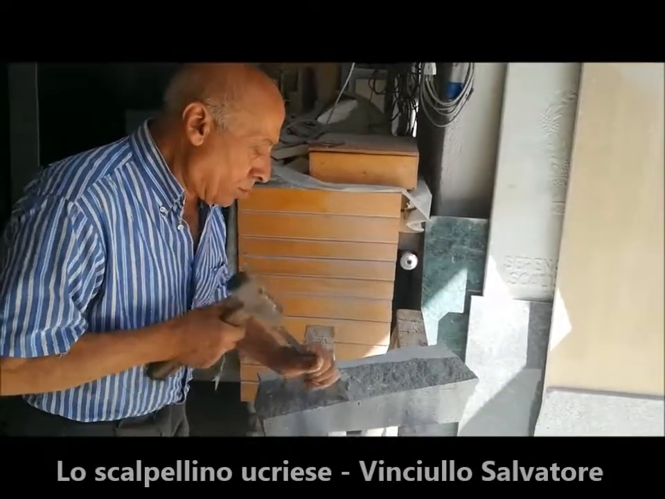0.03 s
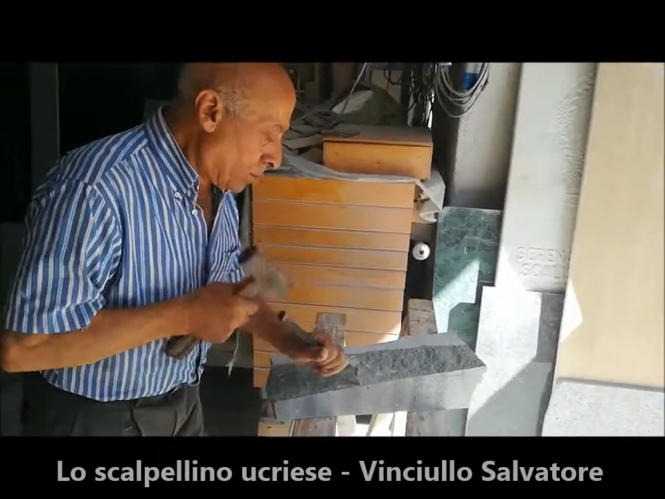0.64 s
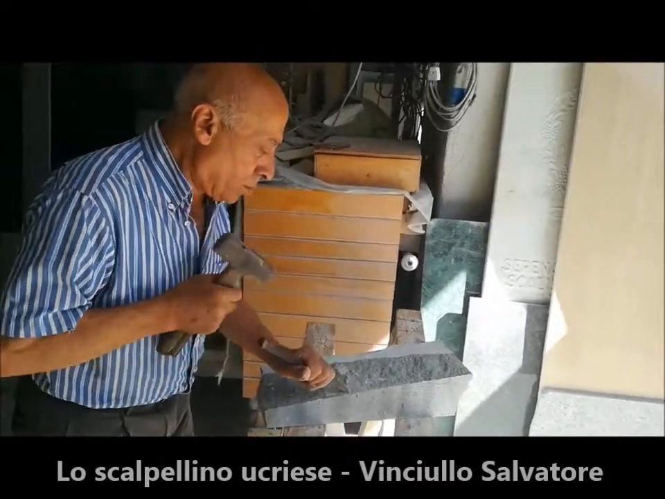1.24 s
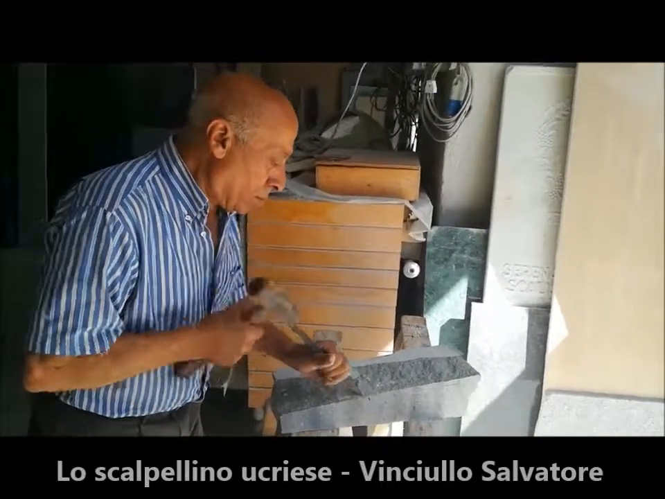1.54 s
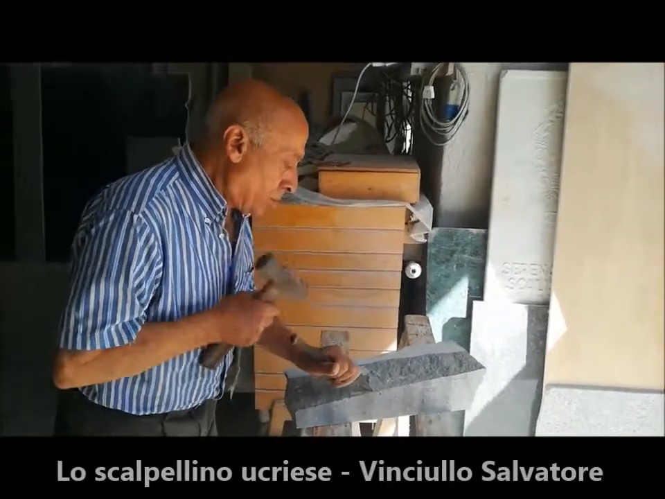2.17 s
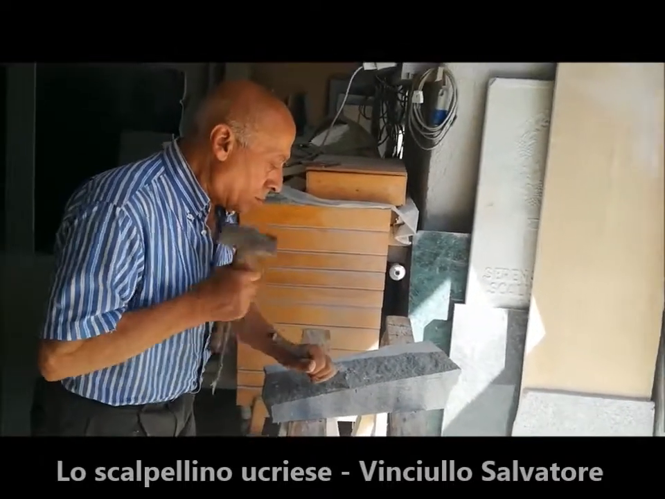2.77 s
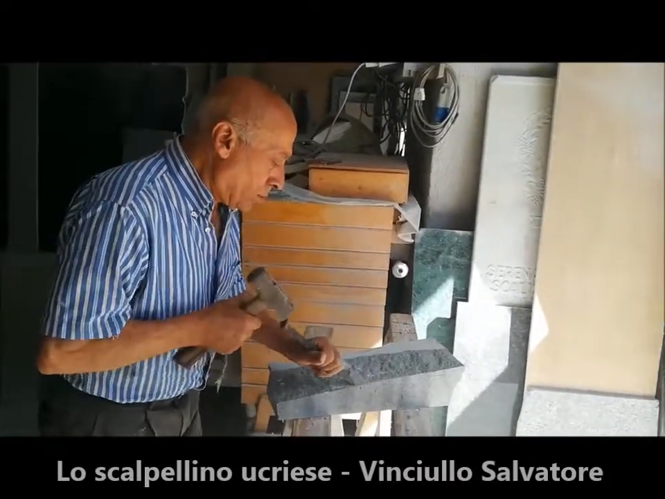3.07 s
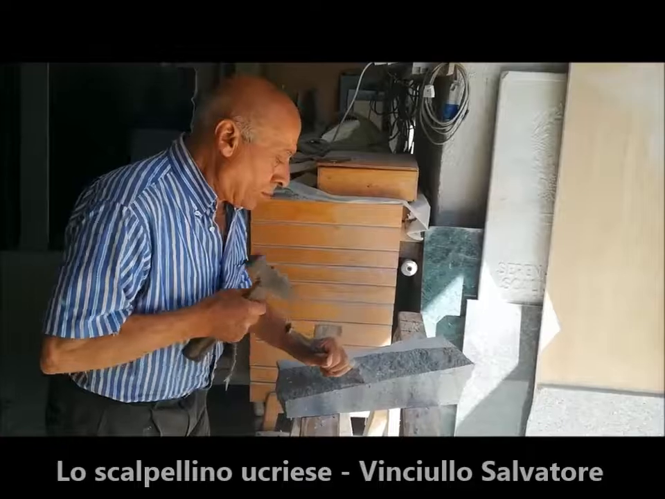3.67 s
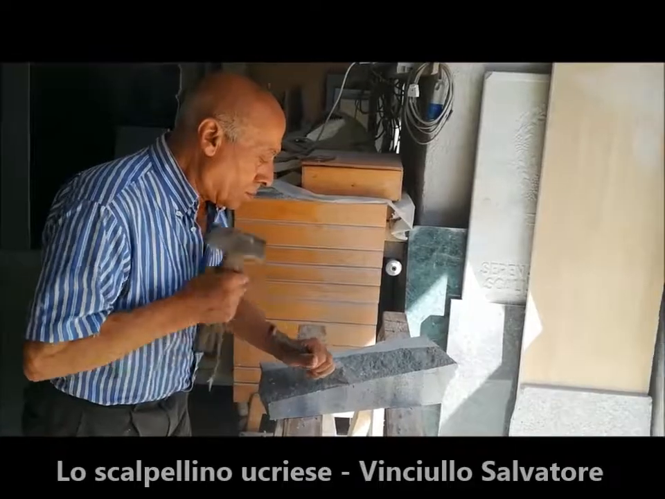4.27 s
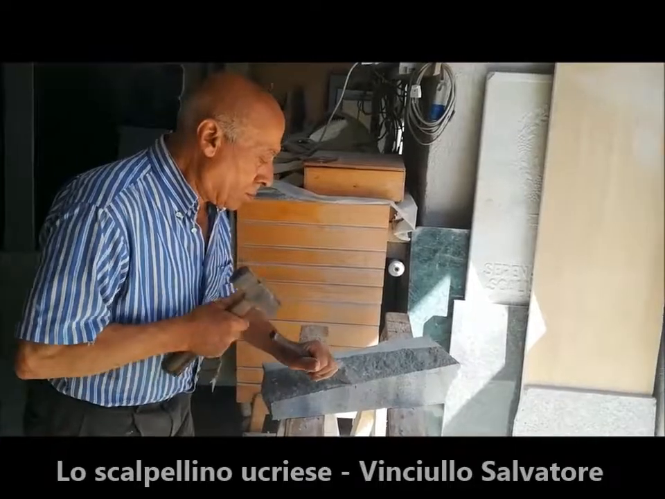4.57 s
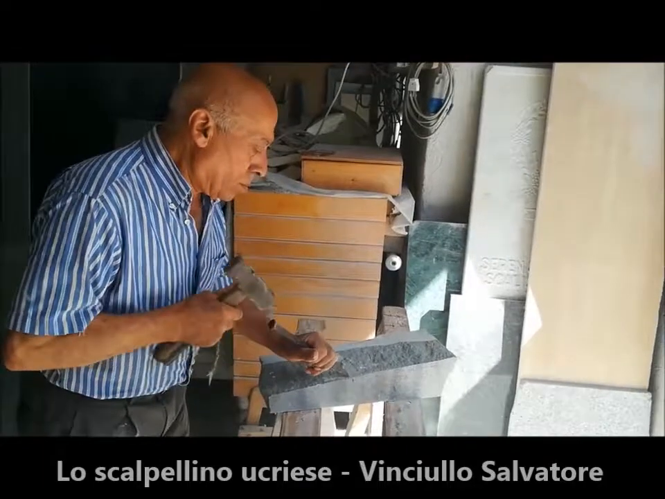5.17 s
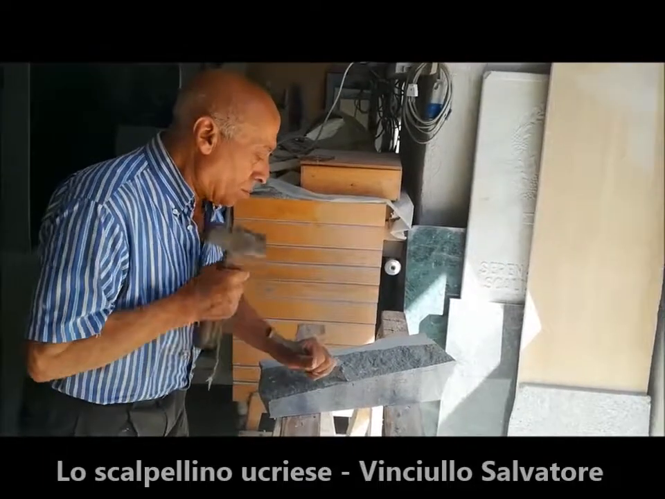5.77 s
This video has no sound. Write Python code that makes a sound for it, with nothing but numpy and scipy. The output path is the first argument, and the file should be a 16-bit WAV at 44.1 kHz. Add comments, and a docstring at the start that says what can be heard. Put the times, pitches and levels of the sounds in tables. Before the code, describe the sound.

Close by in a small workshop, a steel chisel is hammered against stone in an even rhythm of two blows a second. Every hit gives a bright clank, with steel and block ringing briefly into the room. The blows soften a little, a faint tap and scrape slips between two of them, and they grow harder again at the end. A barely audible low hum fades early, leaving still air underneath.

```python
"""A mason hammers a steel chisel into a stone block, two blows a second, in a small workshop.
Each blow cracks the stone, makes the block and the hand-held chisel ring, and fills the room.
Once, the mason sets the tip on a new spot with a light tap and a faint scrape.
Behind it are quiet air and a low hum that dies away. Two microphones stand close by;
the left one overloads on the hardest blows."""
import sys
import numpy as np
from scipy import signal
from scipy.fft import rfft, irfft
from scipy.io import wavfile
from scipy.ndimage import uniform_filter1d

SR = 44100
rng = np.random.default_rng(int(sys.argv[2]) if len(sys.argv) > 2 else 0)


def materialize(psi):
    """Save the field psi as 16-bit PCM at rate SR to the path in sys.argv[1].

    A 1-D psi becomes a single channel; in a 2-D psi each row is a channel.
    """
    bounded = np.clip(np.atleast_2d(psi).T, -1, 1)
    quanta = np.round(bounded * 32767).astype(np.int16)
    wavfile.write(sys.argv[1], SR, quanta)


N = 256220
BLOW_SAMPLES = 40000
AGE = np.arange(BLOW_SAMPLES) / SR  # seconds since a blow landed

# The hammer blows. Bed is how solidly the tip sits in the stone; square is how flush the hammer lands.
# Bend and block count from the force; seat is how much their higher tones are favoured.
# t/s, force/dB, bed/dB, square/dB, lowest chisel bend/dB, block ring/dB, seat/dB
BLOWS = [(-.4, -18, 1.5, -3.5, -5.5, -11.5, -2.5), (0.089, -18, -2, -12, -12.5, -14, 4),
         (0.5783, -15, -1, 1.5, -5.5, -14.5, 4), (1.0696, -20, 0, -5, -7.5, -16.5, 2.5),
         (1.567, -25, 1, -2.5, -7, -6, -1.5), (2.087, -23, -3, -5.5, 0.5, -8, 16.5),
         (2.5633, -21.5, 0.66, -2, -15, -28.5, -7.5), (3.0514, -21.5, 0.5, -6.5, -8, -12.5, -2.5),
         (3.5502, -20, 4, -1.5, -10.5, -7.5, -1), (4.0393, -21, -0.1, -0.5, -19, -12, 6),
         (4.5294, -20, 8.5, 1, -11.5, -2.5, -3), (5.021, -16, 0.4, 3.5, -20, -9.5, 6),
         (5.5647, -16, 0.5, 1.5, -1, -17, 1.5)]


def chiselling(bands, usual_force_db=-20):
    """Each blow sounds the stone and the chisel; the echoes change as the mason moves."""
    out = np.zeros((2, N + BLOW_SAMPLES))
    for start_s, force_db, bed_db, square_db, lowest_db, block_db, seat_db in BLOWS:
        extra_db = force_db - usual_force_db
        # a bedded tip drives the room through the block; after a hard blow the echo is no louder than after a
        # light one
        path = workshop(bands, room_db=2.5 + 0.31 * bed_db - 0.55 * extra_db)
        blow = heard(stone_crack(bed_db, square_db), path, force_db)
        blow += block_ring(path, force_db + block_db, length=1.05, seat_db=seat_db, rise_s=0.0066)
        looseness = .68 + 0.0548 * extra_db  # a hard blow jolts the grip loose, so the steel rings on
        blow += chisel_ring(path, force_db, bed_db, square_db, lowest_db, seat_db, looseness)
        add_blow(out, blow, start_s)
    return out[:, :N]


# The basic tone colour of steel cracking stone: f/Hz, level/dB
CRACK_COLOUR = [(30, -28.5), (70, -26.5), (105, -9), (280, -10.5), (410, -3.5), (600, -4), (820, -4.5),
                (1130, -0.5), (1950, -6), (4000, -1), (5400, -1), (6500, 4.5), (9000, -9.5), (15500, -21)]
# Broad resonant humps in the crack, the strongest a clank near 2.5 kHz: f/Hz, width/Hz, boost/dB
CRACK_HUMPS = [(2546, 230, 10.5), (3950, 280, 0.5), (5025, 430, 1.5)]


def stone_crack(bed_db=0, square_db=0, thud_hz=1500, bite_hz=6400, bite_width_hz=900, fizz_hz=8300):
    """The block thuds, the edge bites and chips fizz, all in one click (returned as a spectrum)."""
    thud_db = -2.5 + 0.87 * bed_db  # a bedded tip drives the block
    bite_db = -1 + .22 * square_db  # a square blow is brighter
    fizz_db = 1.14 + .65 * square_db - 0.4 * bed_db  # a bedded tip throws fewer chips
    hz = frequencies(BLOW_SAMPLES)
    lows = 1 / (1 + (hz / thud_hz) ** 4)
    highs = 1 - 1 / (1 + (hz / fizz_hz) ** 12)
    peaks = [*CRACK_HUMPS, (bite_hz, bite_width_hz, bite_db)]
    humps_db = sum(db * np.exp(-((hz - centre) / width) ** 2) for centre, width, db in peaks)
    # stone never breaks the same way twice
    fracture_db = 2.9 * np.interp(hz, np.linspace(0, SR / 2, 40), rng.standard_normal(40))
    colour_db = look_up(CRACK_COLOUR, hz) + thud_db * lows + fizz_db * highs + humps_db
    return shortest_click(colour_db + fracture_db * (1 - lows))


# The chisel's five ways of bending; hand and stone split each into a group of close tones.
# f/Hz, level within the group/dB, ring time before the length factors/s
CHISEL_BENDS = [
    [(2466, 0, .06), (2425, -3, .025), (2545, -6, .05), (2650, -13, .06), (2754, -17, .06)],
    [(4695, 0, .048), (4610, -2, .035), (4378, -12, .04), (4790, -7, .035), (4890, -9, .04)],
    [(7562, 0, .05), (7640, -4, .03), (7260, -10, .03), (7890, -10, .04)],
    [(10782, 0, .07), (11120, 0, .035), (10900, -4, .03)],
    [(15060, 0, .05), (15200, -2, .025), (12850, -3, .04), (13570, -5, .04)],
]
# Sound that each bend beams straight at the microphones: level over its echoes/dB, ring length factor
BEND_BEAMS = [(6, 1.0), (-3, 0.69), (0, 0.76), (-14.5, 0.56), (-7, .9)]
# Strength of bends 2-5: level from the force/dB, gain per dB of square/dB, loss per dB of bed above 0/dB
UPPER_BENDS = [(-0.74, 0.96, -0.15), (-3.5, 0.63, 7), (-16.5, 0.56, 0.34), (-23.5, 0.95, -0.5)]


def chisel_ring(path, force_db, bed_db, square_db, lowest_db, seat_db, looseness):
    """The struck steel bends to and fro while the hand damps it."""
    upper_db = [db + gain * square_db - loss * max(bed_db, 0) for db, gain, loss in UPPER_BENDS]
    out = np.zeros((2, BLOW_SAMPLES))
    for tones, db, (beam_db, length) in zip(CHISEL_BENDS, [lowest_db, *upper_db], BEND_BEAMS):
        out += heard(ring(tones, looseness * length, seat_db), path + amp(beam_db), force_db + db)
    return out


# Tones of the block and hammer head: f/Hz, relative level/dB, ring time before the length factor/s
BLOCK_TONES = [(1530, -4, .04), (1478, -1, .05), (1562, 0, .09), (1600, -7, .05), (1574, -21, .6),
               (1548, -23, .55)]


def block_ring(path, db, **shape):
    """The stone block and the hammer head ring at a few close pitches."""
    return heard(ring(BLOCK_TONES, **shape), path, db)


def ring(tones, length=1, seat_db=0, rise_s=0.0026):
    """Spectrum of fading tones set off by one hit; a stiffly seated tip favours the higher ones."""
    out = np.zeros(BLOW_SAMPLES)
    main_hz = tones[0][0]
    for hz, db, base_ring_s in tones:
        ring_s = base_ring_s * max(length, .1)
        age = AGE[:int(2 * ring_s * SR)]
        side = np.tanh((hz / main_hz - 1) / .03)  # -1 below the main tone, +1 above it
        out[:len(age)] += amp(db + seat_db * side) * np.sin(2 * np.pi * hz * age) * fade(ring_s)[:len(age)]
    return rfft(out * (1 - np.exp(-AGE / rise_s)))


def tip_tap(bands, start_s=1.869):
    """The tip is put down on a new spot: a tick that wakes the block and the lowest bend."""
    out = np.zeros((2, N + BLOW_SAMPLES))
    path = workshop(bands, room_db=10)
    tick = heard(stone_crack(), path, db=-62)
    steel = heard(ring(CHISEL_BENDS[0], length=0.32, seat_db=18), path, db=-48)
    add_blow(out, tick + steel + block_ring(path, db=-58), start_s)
    return out[:, :N]


def tip_scrape(db=-62, centre_hz=5600, width_hz=1900, start_s=1.9, peak_s=2.07, release_s=0.014):
    """The tip drags faintly over the stone as the mason sets it again."""
    grit = noise(np.exp(-((frequencies(N) - centre_hz) / width_hz) ** 2))
    drag = np.interp(np.arange(N) / SR, [start_s, peak_s, peak_s + release_s], [0, 1, 0])
    return amp(db) * grit * drag


# The workshop's lingering echo: f/Hz, level before room_db is added/dB, time to fade by 60 dB/s
ROOM_ECHO = [(61, 13.5, 0.61), (133, -4.5, 1.1), (279, 0, 0.82), (460, -2.5, 0.7), (1460, -8, 0.87),
             (3670, -3, 0.65), (7020, -15.5, 0.58), (10500, -7, 0.45), (14500, -13.5, 0.14)]


def echo_bands(count=12):
    """The room's echo in overlapping pitch bands, each with its own level and fade."""
    centres_hz = np.geomspace(60, 15000, count)
    log_hz = np.log(frequencies(BLOW_SAMPLES) + 1)
    shares = [np.interp(log_hz, np.log(centres_hz), row) for row in np.eye(count)]
    levels_db, rings_s = look_up(ROOM_ECHO, centres_hz), look_up(ROOM_ECHO, centres_hz, column=2)
    decays = [amp(db) * unit_energy(fade(ring_s)) for db, ring_s in zip(levels_db, rings_s)]
    return list(zip(shares, decays))


def workshop(bands, room_db, bench_ring_s=0.037, wall_ring_s=0.17, wall_db=-4):
    """The path to each microphone: quick bounces off the bench, then near walls, then a long echo."""
    bench, walls, scattered = rng.standard_normal((3, 2, BLOW_SAMPLES))
    quick_rise, slow_rise = 1 - np.exp(-AGE / 0.00032), 1 - np.exp(-AGE / 0.004)
    early = unit_energy(bench * fade(bench_ring_s) * quick_rise)
    early += amp(wall_db) * unit_energy(walls * fade(wall_ring_s) * slow_rise)
    late = sum(share * rfft(scattered * decay * slow_rise) for share, decay in bands)
    return rfft(early) + amp(room_db) * late


# The tone colour of the shop's still air: f/Hz, relative level/dB
AIR_COLOUR = [(18, -36), (30, -12), (73, 9.5), (680, -18.5), (2490, -2.5), (3880, -11), (4650, -11.5),
              (5300, -31.5), (15000, -40)]


def air_and_hum(air_db=-76, hum_hz=75.4, hum_db=-66.5, hum_fade_s=1.4):
    """Quiet air, and a faint low hum that dies away."""
    t = np.arange(N) / SR
    air = noise(amp(look_up(AIR_COLOUR, frequencies(N))))
    hum = np.sin(2 * np.pi * hum_hz * t) * np.exp(-(t / hum_fade_s) ** 2)
    return amp(air_db) * air + amp(hum_db) * hum


def amp(db):
    """Turn decibels into a multiplier."""
    return 10 ** (np.asarray(db) / 20)


def look_up(table, hz, column=1):
    """Read a table at any pitch, gliding from row to row."""
    table = np.array(table, float)
    return np.interp(np.log(hz + 1), np.log(table[:, 0]), table[:, column])


def frequencies(samples):
    """The frequency in Hz of each point in a spectrum."""
    return np.arange(samples // 2 + 1) * SR / samples


def fade(ring_s):
    """A fade that falls by 60 dB in the ring time."""
    return np.exp(-np.log(1000) * AGE / ring_s)


def noise(colour):
    """Stereo noise of strength 1, shaped by one multiplier per frequency."""
    x = irfft(rfft(rng.standard_normal((2, N))) * colour, N)
    return x / x.std()


def shortest_click(colour_db):
    """Spectrum of the shortest click that has this tone colour (minimum phase)."""
    cepstrum = irfft(np.log(amp(colour_db)))
    cepstrum[1:BLOW_SAMPLES // 2] *= 2
    cepstrum[BLOW_SAMPLES // 2 + 1:] = 0
    return np.exp(rfft(cepstrum))


def unit_energy(x):
    """Scale each channel so that its energy is 1."""
    return x / np.sqrt(np.sum(x ** 2, axis=-1, keepdims=True))


def heard(spectrum, path, db, spread_s=.04):
    """Send a sound through the room; db is its level if its energy were spread over spread_s."""
    return unit_energy(irfft(spectrum * path)) * amp(db) * np.sqrt(spread_s * SR)


def add_blow(out, sound, start_s):
    """Fade out the end of one hit and lay it into the scene at its time."""
    start = int(start_s * SR)
    faded = sound * np.interp(AGE, [.6, .8], [1, 0])
    out[:, max(start, 0):start + BLOW_SAMPLES] += faded[:, max(-start, 0):]


def scene():
    """The mason's work and the quiet around it."""
    bands = echo_bands()
    return chiselling(bands) + tip_tap(bands) + tip_scrape() + air_and_hum()


# The right microphone faces away from the work. Next to the left one it has, at each pitch:
# f/Hz, level/dB, likeness/0-1, phase lag/rad
RIGHT_MIC = [(60, 0, .85, .05), (200, -.5, .9, .2), (300, -1, .87, .55), (480, -4, .8, 1.5),
             (680, -9, .5, 2.3), (950, -8, .5, .1), (1250, -4, .6, .1), (1600, -2, .45, .4),
             (2500, -2, .75, 2.0), (4000, -3, .4, 2.5), (4750, -12, .2, 4.5), (6800, -19, .2, 11),
             (10000, -11, .2, 21), (14000, -3, .2, 29)]


def microphones(x):
    """Two close microphones share the bass; the right one is shaded and slightly late."""
    hz = frequencies(N)
    left, right = rfft(x)
    likeness = np.clip(look_up(RIGHT_MIC, hz, column=2), 0, 1)
    late_left = left * np.exp(-1j * look_up(RIGHT_MIC, hz, column=3))
    right = likeness * late_left + np.sqrt(1 - likeness ** 2) * right
    return irfft(np.array([left, right * amp(look_up(RIGHT_MIC, hz))]), N)


def noise_suppressor(x, threshold_db=-49, cut_per_db=0.73, max_cut_db=10, window_s=.025):
    """Turn the sound down once it sinks under the threshold."""
    power = uniform_filter1d(np.mean(x ** 2, axis=0), int(window_s * SR))
    under_db = threshold_db - 10 * np.log10(np.abs(power) + 1e-18)
    return x * amp(-np.clip(cut_per_db * under_db, 0, max_cut_db))


def record(dry, low_cut_hz=55, top_cut_hz=15700):
    """Microphones, noise suppression and overload, then the deepest bass and top treble are cut."""
    x = np.clip(noise_suppressor(microphones(dry)), -1, 1)
    x = signal.sosfilt(signal.butter(1, low_cut_hz, "high", fs=SR, output="sos"), x)
    return signal.sosfilt(signal.ellip(8, .2, 90, top_cut_hz, fs=SR, output="sos"), x)


dry = scene()
out = record(dry)
materialize(out)
```